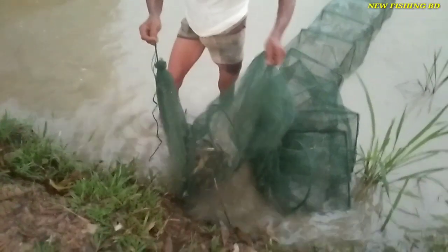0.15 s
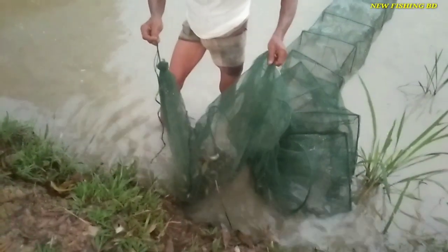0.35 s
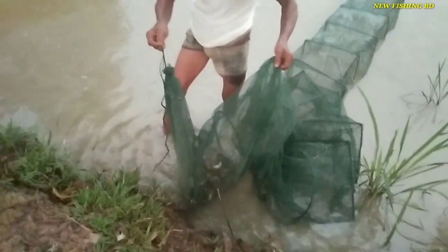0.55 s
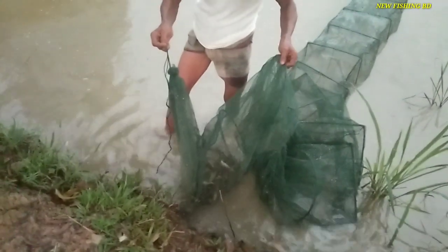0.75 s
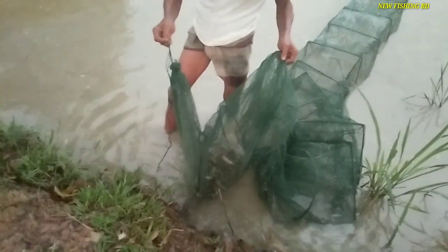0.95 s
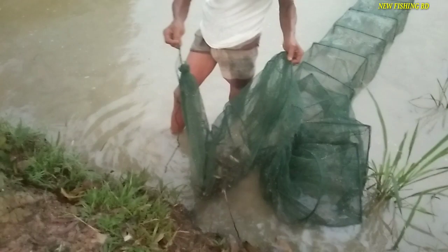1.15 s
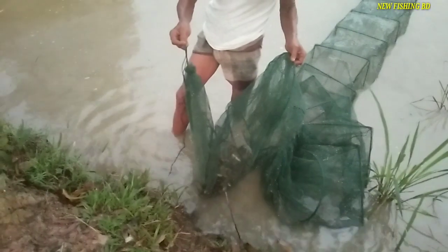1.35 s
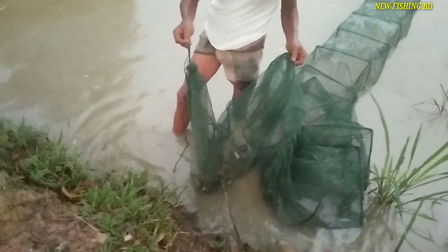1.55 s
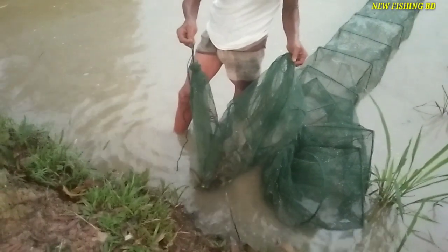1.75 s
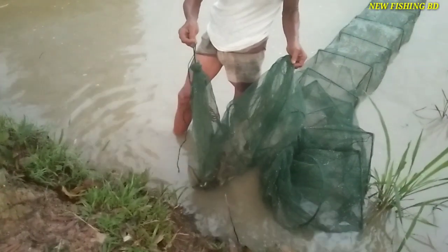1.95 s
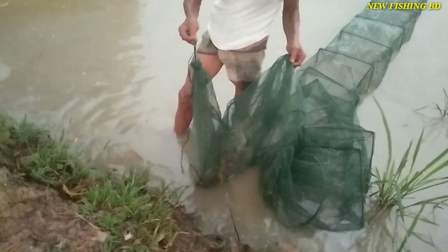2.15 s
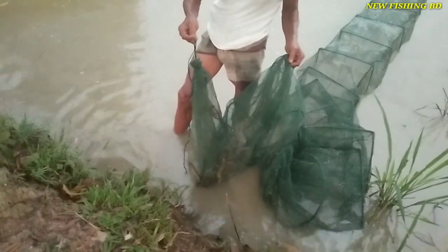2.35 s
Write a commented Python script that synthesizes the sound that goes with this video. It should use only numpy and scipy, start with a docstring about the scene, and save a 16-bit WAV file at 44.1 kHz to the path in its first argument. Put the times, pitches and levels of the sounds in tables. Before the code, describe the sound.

Water drips and trickles from a net into a pond, with faint crickets and birds.

```python
"""Drops tick and plop on a shallow pond over a fine trickle, as water runs off a mesh net held above it.
Each drop rings and splashes, and bubbles ring here and there among them. Near the start a cord snaps
taut and something bumps the phone. Two crickets stroke falling notes, far birds whistle and a dove
coos, over low field rumble and a far insect chorus."""
import sys
import numpy as np
from scipy import signal
from scipy.fft import rfft, irfft
from scipy.io import wavfile
from scipy.ndimage import uniform_filter1d

SR = 44100
rng = np.random.default_rng(int(sys.argv[2]) if len(sys.argv) > 2 else 0)


def output_pcm(signal):
    """Save a mono or channel-first signal as 16-bit PCM at the path in sys.argv[1].

    Samples are clipped to [-1, 1] before scaling.
    """
    pcm = np.clip(np.atleast_2d(signal).T, -1, 1) * 32767
    wavfile.write(sys.argv[1], SR, np.round(pcm).astype(np.int16))


N = 105840

# flow off the net, riding the trickle and the rush: t/s, level/dB
NET_FLOW = [(0, -40.5), (.08, -45), (.15, -44.5), (.25, -52.5), (.42, -52), (.58, -55.5), (.75, -53.5),
            (.9, -49.5), (1.03, -59.5), (1.17, -58.5), (1.32, -54), (1.42, -55), (1.5, -61.5), (1.6, -54.5),
            (1.75, -54), (1.9, -55.5), (2.0, -51.5), (2.201, -57.5), (2.4, -58)]


def drops():
    """Each drop hits the pond with a short ring, a splash, a soft spray and scattered droplets."""
    # impacts: t/s, ring peak/dB, ring f/Hz, relative spray level/dB, relative low splash level/dB
    impacts = [(0.0324, -48, 4440, -73, -41), (0.1398, -37, 3800, -114, -53),
               (0.2147, -37, 4160, -60, -46.5), (0.2317, -46, 4660, -61, -48), (0.284, -40, 4150, -61, -63),
               (0.2993, -36, 4570, -63, -71), (0.363, -33, 4440, -62, -51), (0.3824, -45, 4350, -61, -71),
               (0.3987, -36.5, 4390, -63, -50), (0.4189, -49, 5260, -56.5, -48),
               (0.4992, -39, 4740, -64, -68), (0.5255, -30, 4730, -64, -67), (0.5537, -39, 4280, -76, -69),
               (0.615, -36.5, 4660, -75, -55), (0.7124, -40, 4320, -60, -73), (0.7744, -38, 4000, -85, -51),
               (0.851, -42, 4040, -51.5, -66), (0.8607, -37.5, 2740, -73, -70),
               (0.8629, -28, 3590, -65, -71), (0.886, -44, 3970, -80, -61), (0.9094, -43, 3760, -76, -69),
               (0.9513, -49, 3450, -78, -68), (0.972, -42.5, 3700, -80, -63),
               (1.0081, -44.5, 3390, -78, -63), (1.028, -42, 4570, -76, -51), (1.0524, -50, 3160, -73, -74),
               (1.2244, -55, 5010, -84, -50), (1.2655, -45.5, 5050, -80, -74),
               (1.3044, -45, 3380, -71, -53), (1.311, -41, 3100, -76, -56), (1.3281, -24.5, 3680, -41, -35),
               (1.339, -34, 4300, -77, -40), (1.3527, -40, 3560, -61, -51), (1.4481, -35.5, 4090, -76, -77),
               (1.5324, -46, 2870, -77, -50), (1.5474, -51, 3800, -75, -43.5),
               (1.5759, -35.5, 3960, -59, -51), (1.6022, -40, 3820, -76, -69),
               (1.6844, -35.5, 4120, -73, -69), (1.7094, -56, 4220, -81, -51),
               (1.7329, -35, 3080, -78, -51), (1.7428, -42, 4680, -62, -55), (1.752, -32.5, 4120, -57, -56),
               (1.78, -62, 4700, -66, -72), (1.8024, -24, 4400, -40.5, -39),
               (1.8053, -18.5, 3524, -60, -53.5), (1.8463, -41, 3970, -64, -57),
               (1.8731, -30.5, 4460, -81, -47.5), (1.966, -39, 4500, -76, -59),
               (2.0527, -55, 5300, -66.5, -48), (2.142, -45, 4880, -56, -69), (2.1932, -36, 3420, -63, -53),
               (2.2104, -39, 4870, -85, -66), (2.2862, -40.5, 4440, -73, -73)]
    decay_s, rise_s = .011, .0004
    low, body, treble, air = (signal.butter(3, hz, "bandpass", fs=SR, output="sos")
                              for hz in ((800, 2500), (2600, 5300), (7800, 11500), (12300, 15000)))
    t = np.arange(int(.04 * SR)) / SR
    puff = lambda peak_s: np.e * t / peak_s * np.exp(-t / peak_s)
    scatter = rng.standard_normal((len(impacts), 3, 3))  # three droplets a drop
    out = np.zeros(N)
    for (s, db, hz, spray_db, low_db), droplets in zip(impacts, scatter):
        add(out, s, ring(hz, db, decay_s, rise_s))
        noise = rng.standard_normal(len(t))
        splash = noise * puff(.00086)
        add(out, s, undb(db - 8.5) * signal.sosfilt(body, splash))
        add(out, s, undb(low_db + 4) * signal.sosfilt(low, splash))
        linger_db = -7 + min(-59 - spray_db, 0)  # caps the tail of the loudest sprays
        spray = noise * (puff(.00097) + undb(linger_db) * puff(.0064))
        sizzle = signal.sosfilt(treble, spray) + undb(-29) * signal.sosfilt(air, spray)
        add(out, s, undb(spray_db + 2.5) * sizzle)
        for lag, pitch, size in droplets:
            droplet_hz = min(hz * 2 ** (.14 * pitch), 5300)
            droplet_db = min(db - 4.5, -43) + 2 * size
            add(out, s + .007 * lag, ring(droplet_hz, droplet_db, decay_s, rise_s, glide=45))
    return out


def bubbles():
    """Bubbles ring here and there with a gliding plop; the moving surface shakes their level."""
    # plops: t/s, start f/Hz, level/dB, decay/s, glide/(octaves per s)
    plops = [(.05, 883, -45, 0.014, 6), (.243, 1900, -50, 0.029, -6), (.367, 795, -50.5, 0.015, -19),
             (0.859, 1610, -44.5, 0.024, 11), (0.887, 2100, -46.5, 0.0086, 5),
             (1.027, 1430, -47, 0.009, 17), (1.295, 490, -52.5, 0.027, 8), (1.311, 2180, -44, 0.037, -8),
             (1.32, 1143, -46.5, 0.027, 1), (1.33, 680, -45, 0.031, 40), (1.339, 1760, -46, 0.06, 15),
             (1.532, 2960, -44, 0.027, -15), (1.548, 487, -40, 0.046, 1), (1.552, 1850, -45.5, 0.031, 35.5),
             (1.73, 1570, -41.5, 0.03, 48), (1.831, 1120, -49, 0.017, 15), (2.118, 1105, -51, 0.073, 26)]
    out = np.zeros(N)
    for s, hz, db, decay_s, glide in plops:
        add(out, s, ring(hz, db, decay_s, rise_s=.0056, glide=glide))
    return out * flutter(rate_hz=250, depth=.25)


def trickle(per_s, centre_hz, gain_db, rise_s):
    """Tiny drops ping at random moments; their size follows the flow."""
    out, flow = np.zeros(N), np.array(NET_FLOW).T
    count = int(N / SR * per_s)
    times = rng.random(count) * N / SR
    scatter = rng.standard_normal((count, 2))
    for s, (pitch, length), size in zip(times, scatter, rng.exponential(size=count)):
        hz = centre_hz * 2 ** (.24 * np.clip(pitch, -2, 1.5))
        db = np.interp(s, *flow) + gain_db + 2.5 * size
        cycles = 20 * 2 ** (length / 2)
        add(out, s, ring(hz, db, cycles / hz, rise_s, glide=30))
    return out


def rush():
    """Drops too dense to tell apart: a wash that dies faster than the flow."""
    # colour of the wash: f/Hz, relative density/dB
    wash_colour = [(590, -28), (1000, -17.5), (1250, -14.5), (1440, -19), (1780, -13), (3640, -2.5),
                   (4940, 4), (5860, -23), (9980, -25.5), (15000, -45)]
    wash = irfft(noise_spectrum(wash_colour)[1], N)
    full_db = max(db for _, db in NET_FLOW)
    ebb_db = 1.153 * (fader(NET_FLOW) - full_db)
    return wash / wash.std() * undb(full_db - 1.5 + ebb_db + 1.3 * walk(31))


def cord_snap():
    """The cord snaps taut and its modes ring, neighbours starting in opposite directions."""
    # cord modes: f/Hz, peak/dB, decay/s
    cord_modes = [(374, -27, 0.0068), (1230, -12, 0.0045), (3040, -31, 0.0038), (4800, -5.5, 0.0058),
                  (6560, -13, 0.0018), (9500, -28.5, 0.0016), (14200, -25.5, 0.0034)]
    out = np.zeros(N)
    for k, (hz, db, decay_s) in enumerate(cord_modes):
        rise_s = max(.00022, .43 / hz)  # low modes swell more slowly
        add(out, .09065, (-1) ** k * ring(hz, db, decay_s, rise_s))
    return out


def phone_bump():
    """Something bumps the phone: a sharp tick with a soft thud just behind it."""
    # modes of the tick and of the thud: f/Hz, peak/dB, decay/s
    tick_modes = [(500, -64, 0.0024), (1310, -31.5, 0.0082), (2500, -54, 0.0027), (4040, -29, 0.0031),
                  (13100, -47.5, 0.0021)]
    thud_modes = [(119, -38, 0.034), (267, -28.5, 0.014), (837, -33.5, 0.016)]
    hit_s, lag_s = .1718, .0012
    out = np.zeros(N)
    for k, mode in enumerate(tick_modes):
        add(out, hit_s, (-1) ** k * ring(*mode, rise_s=.00022))
    for mode in thud_modes:
        add(out, hit_s + lag_s, ring(*mode, rise_s=.00053))
    return out


def crickets():
    """Falling notes: one cricket chirps in quick threes, the other in slower groups of longer strokes."""
    # chirps of the near cricket and strokes of the other: t/s, level/dB
    chirps = [(.18, -41), (.416, -42), (.649, -43), (.885, -45), (1.119, -45), (1.353, -47), (1.587, -49),
              (1.822, -47), (2.058, -46), (2.291, -49)]
    strokes = [(.021, -43), (1.947, -65.5), (1.991, -41), (2.161, -46.5), (2.203, -40), (2.245, -40),
               (2.372, -43)]
    spacing_s = .032
    out = np.zeros(N)
    for s, db in chirps:
        for k in range(3):
            add(out, s + k * spacing_s, whistle(.015, 5450, 4650, db + rng.standard_normal()))
    for s, db in strokes:
        add(out, s, whistle(.02245, 5480, 4344, db))
    return out


def birds():
    """Short far whistles, roughened by leaves and air."""
    # calls: t/s, length/s, start f/Hz, end f/Hz, level/dB
    calls = [(.668, 0.0264, 4130, 3930, -36), (.62, 0.106, 4110, 4020, -47.5),
             (0.741, .03, 3700, 3720, -44), (0.766, 0.058, 3430, 3290, -47), (0.823, 0.03, 4150, 3900, -49),
             (.87, 0.038, 3810, 3840, -44), (0.926, 0.15, 3355, 3320, -54), (1.631, .025, 3290, 3690, -41),
             (1.641, 0.034, 3100, 3020, -49), (1.675, 0.012, 3130, 3060, -43)]
    out = np.zeros(N)
    for s, *call in calls:
        add(out, s, whistle(*call))
    return out * flutter(rate_hz=220, depth=.4)


def dove():
    """Faint, slightly rising coos, roughened by leaves and air."""
    # coos: t/s, length/s, start f/Hz, end f/Hz
    coos = [(0.245, 0.078, 775, 784), (1.41, .13, 770, 808), (1.579, 0.096, 775, 785)]
    out = np.zeros(N)
    for s, *coo in coos:
        add(out, s, whistle(*coo, db=-64))
    return out * flutter(rate_hz=40, depth=.4)


def field():
    """A bed of air, rumble and far insects, each third of an octave flickering on its own."""
    # colour of the bed: f/Hz, relative density/dB
    bed_colour = [(18, -30), (30, -16.5), (86, 2), (127, 1.5), (174, -2.5), (311, -15), (1720, -23.5),
                  (2610, -27.5), (3310, -14.5), (5040, -4.5), (5450, -9.5), (5900, -20.5), (7090, -21),
                  (7870, -38.5), (9970, -27), (11700, -59.5), (14800, -43), (16000, -36)]
    # narrow bands of the insect chorus: f/Hz, width/Hz, boost/dB
    chorus = [(7170, 230, 4.5), (10220, 210, 4)]
    # swell of the rumble: t/s, relative level/dB
    rumble = [(0, 1), (.5, 2.5), (.9, -0.5), (1.6, 0.5), (2.4, 0.5)]
    f, spectrum = noise_spectrum(bed_colour)
    spectrum *= undb(sum(db * np.exp(-((f - hz) / width) ** 2) for hz, width, db in chorus))
    thirds = 3 * np.log2(f / 20)
    out = np.zeros(N)
    for k in range(31):
        band = irfft(spectrum * np.clip(1 - abs(thirds - k), 0, 1), N)
        out += band * undb(1.5 * walk(11.8) + (k < 12) * fader(rumble))  # only the lows swell
    return out * undb(-54) / out.std()


def ring(hz, db, decay_s, rise_s, glide=0.):
    """A tone that swells softly and dies away, peaking at db; glide is in octaves per s."""
    t = np.arange(int((decay_s + 4 * rise_s) * SR) + 8) / SR
    attack = 1 - np.exp(-(t / rise_s) ** 2)
    shape = attack * np.exp(-np.log(1000) * t / decay_s - (2 * t / decay_s) ** 2)
    f = np.minimum(hz * 2 ** (glide * t), .45 * SR)
    return undb(db) * shape / shape.max() * np.sin(2 * np.pi * np.cumsum(f) / SR)


def whistle(length_s, start_hz, end_hz, db):
    """A sliding note that swells and fades."""
    u = np.linspace(0, 1, int(length_s * SR))
    f = start_hz + (end_hz - start_hz) * u
    return undb(db) * np.sin(np.pi * u) * np.sin(2 * np.pi * np.cumsum(f) / SR)


def noise_spectrum(colour):
    """Frequencies and spectrum of a noise with the given colour."""
    f = np.maximum(np.fft.rfftfreq(N, 1 / SR), 1)
    hz, db = np.array(colour).T
    return f, rfft(rng.standard_normal(N)) * undb(np.interp(np.log(f), np.log(hz), db))


def walk(rate_hz):
    """Smooth random drift with a spread of 1."""
    k = int(SR / rate_hz)
    steps = np.repeat(rng.standard_normal(N // k + 1), k)
    drift = uniform_filter1d(uniform_filter1d(steps, k), k)[:N]
    return drift / drift.std()


def flutter(rate_hz, depth):
    """A randomly wavering gain."""
    return 1 - depth + depth * walk(rate_hz)


def fader(points):
    """A level ride through (t, level) points."""
    return np.interp(np.arange(N) / SR, *np.array(points).T)


def undb(db):
    return 10 ** (np.asarray(db) / 20)


def add(out, s, wave):
    """Mix a short sound in at s seconds."""
    i = max(int(s * SR), 0)
    out[i:i + len(wave)] += wave[:max(N - i, 0)]


def scene():
    """Water up close, animals further off; bank and grass scatter both into a short echo."""
    echo_t60_s = .2
    t = np.arange(int(.3 * SR)) / SR
    tail = rng.standard_normal(len(t)) * np.exp(-np.log(1000) * t / echo_t60_s)
    animals = crickets() + birds() + dove()
    water = drops() + bubbles()
    water += trickle(per_s=990, centre_hz=3880, gain_db=-5, rise_s=.00054)
    water += trickle(per_s=500, centre_hz=7800, gain_db=-22.5, rise_s=.0016)  # fine mist
    send = undb(-8) * animals + undb(-17.5) * water
    echo = signal.fftconvolve(send, tail / np.linalg.norm(tail))[:N]
    return (water + rush() + cord_snap() + phone_bump() + animals + echo + field())[None]


def record(dry):
    """The phone cuts the deep bass and the top."""
    thin = signal.sosfilt(signal.butter(2, 53, "highpass", fs=SR, output="sos"), dry)
    return signal.sosfilt(signal.ellip(8, .2, 70, 15500, fs=SR, output="sos"), thin)


dry = scene()
out = record(dry)
output_pcm(out)
```